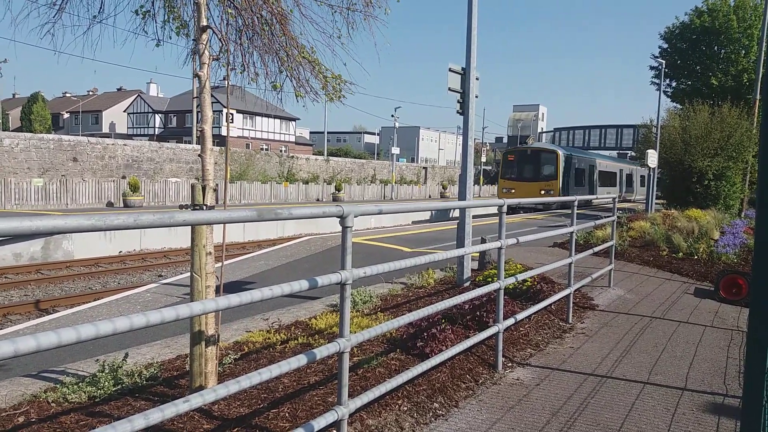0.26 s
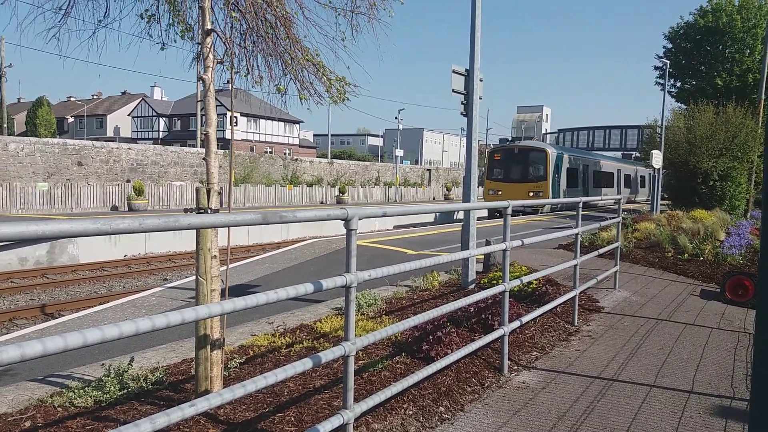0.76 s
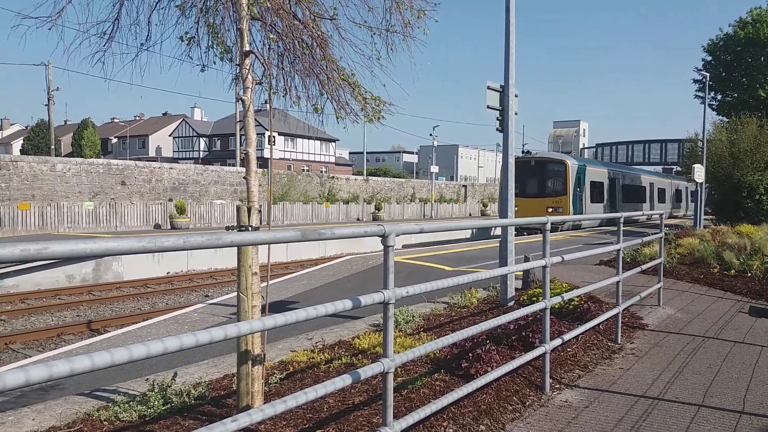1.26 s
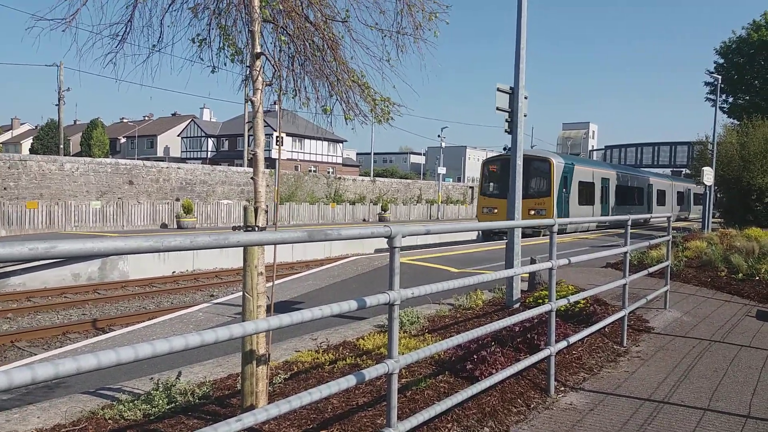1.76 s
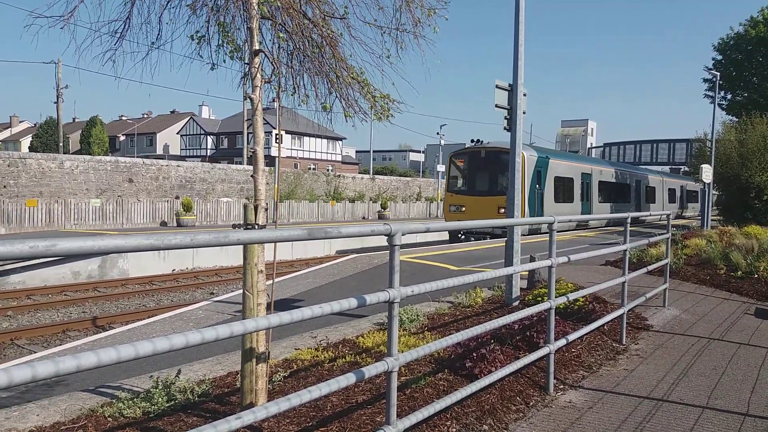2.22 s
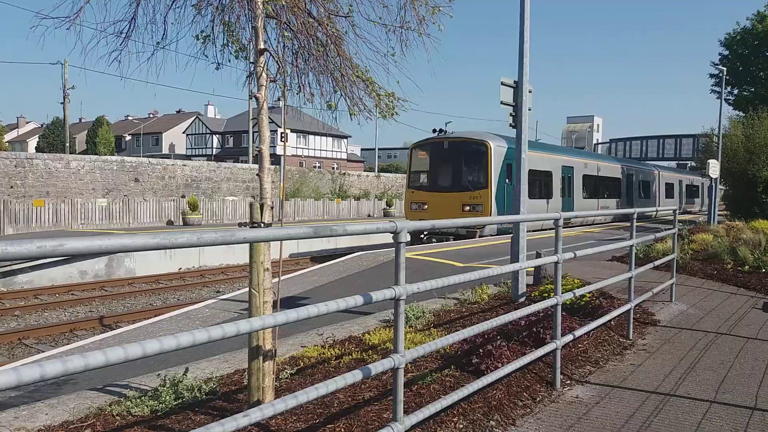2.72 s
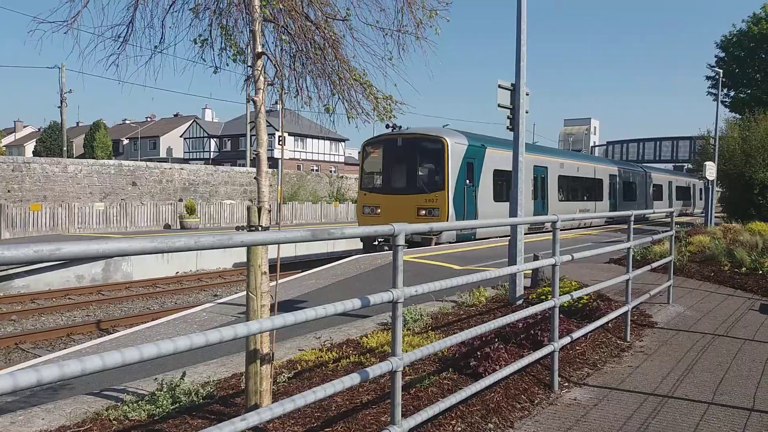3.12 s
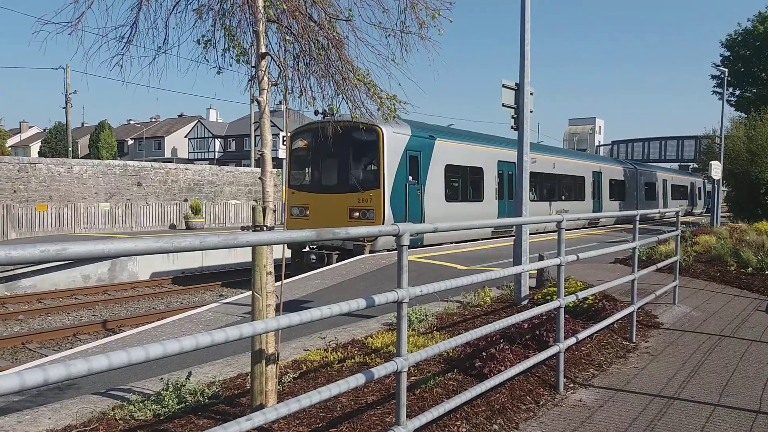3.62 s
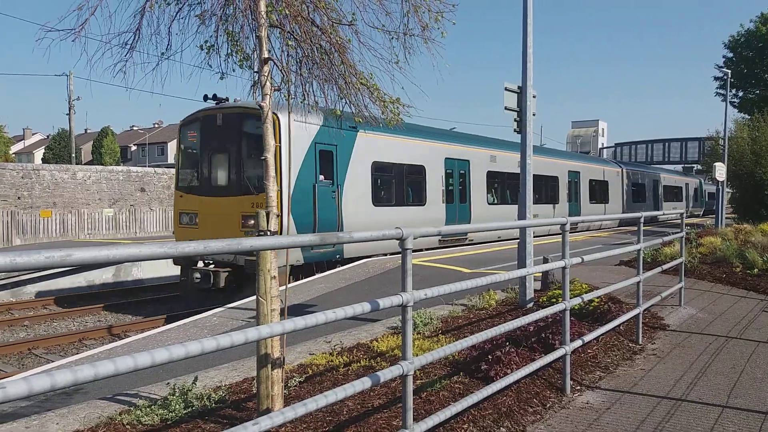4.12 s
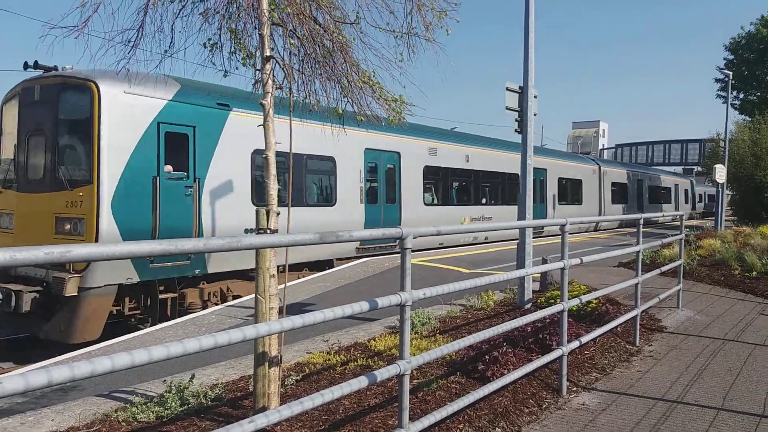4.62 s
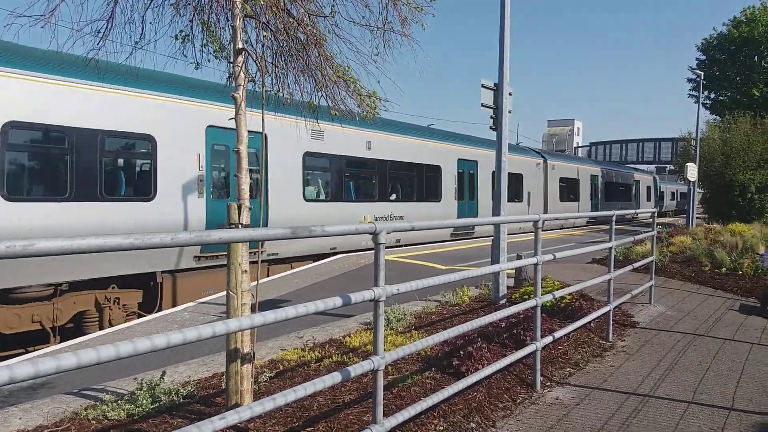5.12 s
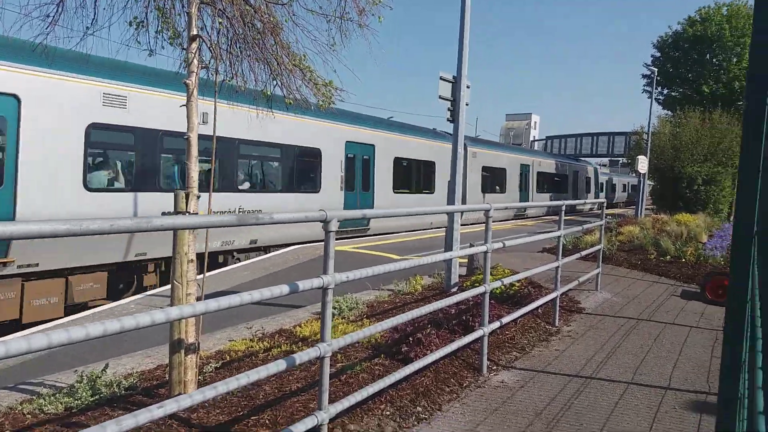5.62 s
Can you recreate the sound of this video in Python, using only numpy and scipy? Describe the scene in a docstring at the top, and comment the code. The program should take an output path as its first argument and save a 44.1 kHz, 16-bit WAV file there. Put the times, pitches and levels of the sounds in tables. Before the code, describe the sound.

A diesel passenger train approaches and passes close by a platform outdoors, heard by one mono microphone with little deep bass and no obvious echo. From 0 to 1.5 s a low throbbing drone around 80 Hz beats as a slower engine revs up and merges with the others. The drone surges strongly near 2 s, then keeps swelling and dipping while creeping slightly upward in pitch, over rumbling exhaust. Soft wheel-rail roar and fan hiss grow throughout, with a faint very high turbocharger band strongest near 4 s. Two light dull knocks come at 2.8 s, stronger ones between 3.9 and 4.2 s, another at 5.5 s. A valve vents a short airy hiss around 4.6-4.8 s. From about 4.7 s a wavering gear whine near 1700 Hz emerges; a tiny upward squeak flicks at 5.35 s. The rushing roar is loudest at the end, about 5.9 s, without fading.

```python
"""A throbbing diesel drone comes first: a railcar pulls towards a platform, its underfloor engines revving up.
The drone is cosines on multiples of the crank speed; a late engine beats against the others before it merges.
Shaped noise makes the exhaust rumble, wheel and rail roar, fan hiss and turbocharger band as the train nears.
Short pushes knock over rail joints, a valve hisses once, and a wavering gear tone emerges near the end."""
import sys
import numpy as np
from scipy import signal
from scipy.io import wavfile
from scipy.ndimage import uniform_filter1d

SR = 44100
rng = np.random.default_rng(int(sys.argv[2]) if len(sys.argv) > 2 else 0)


def boost(x):
    """Linear amplitude factor 10**(x/20) for a level x in decibels (scalar or array-like)."""
    u = np.asarray(x, float) / 20
    return 10 ** u


def output_pcm(signal):
    """Save a mono or channel-first signal as 16-bit PCM at the path in sys.argv[1].

    Samples are clipped to [-1, 1] before scaling.
    """
    pcm = np.clip(np.atleast_2d(signal).T, -1, 1) * 32767
    wavfile.write(sys.argv[1], SR, np.round(pcm).astype(np.int16))


N = 258867
T = np.arange(N) / SR  # time of every sample in s

# How the approach grows: t/s, rolling roar level/dB, fan hiss level/dB, thin top hiss level/dB
APPROACH = [(0, -37.5, -37, -58.5), (.5, -37.5, -39, -61.5), (1, -36.5, -38, -58), (1.5, -36, -38, -58),
            (2.11, -33.5, -39, -59.5), (2.66, -32, -34.5, -54), (3.12, -31.5, -36, -55.5),
            (3.56, -30, -32, -52), (3.9, -28, -32.5, -54), (4.2, -27.5, -33.5, -53),
            (4.55, -28.5, -32, -51.5), (5, -26.5, -36, -52), (5.3, -24.5, -34, -50),
            (5.55, -21, -30.5, -47), (5.87, -18, -28, -43.5)]

# Noise colours, used for their shape only: f/Hz, level/dB (per Hz)
RUMBLE_FAR = [(24, -39), (40, -34), (70, -3), (119, -8), (157, -1), (265, -7.5), (314, -11), (371, -16.5),
              (700, -21.5), (910, -54), (1540, -120)]
RUMBLE_NEAR = [(24, -43), (40, -33), (58, -16), (86, 3), (107, -2.5), (129, -5.5), (177, -3.5), (299, -5.5),
               (700, -17.5), (910, -49), (1540, -120)]
ROLL_FAR = [(260, -26), (450, -13), (471, -6.5), (570, -3.5), (660, -12), (781, -2.5), (1300, -7.5),
            (1480, -2.5), (1800, -7.5), (2800, -8.5), (3640, -41), (6160, -120)]
ROLL_MID = [(260, -9), (450, 0.5), (665, -8), (781, 0.5), (843, -0.5), (1340, -7), (1550, 0.5),
            (1730, -0.5), (2400, -9.5), (2800, -9), (3640, -19), (6160, -120)]
ROLL_NEAR = [(260, -29), (450, -8), (482, -1.5), (675, -5.5), (799, -2), (1190, -1), (1360, -3),
             (1690, -0.5), (2370, -11), (2800, -14.5), (3640, -34), (6160, -120)]
FAN_FAR = [(1470, -13), (2500, -6), (2630, -44), (2880, -4.5), (3130, -5), (4060, -1.5), (4960, -11),
           (6630, -15), (7800, -38.5), (10100, -67), (17200, -120)]
FAN_MID = [(1470, -19), (2500, -6), (2670, -4), (3250, -4), (3930, 1.5), (5230, -7.5), (6150, -7.5),
           (6860, -13), (7800, -33.5), (10100, -59), (17200, -120)]
FAN_NEAR = [(1470, -13), (2500, -11), (3140, 0), (3760, 2), (4470, 1.5), (5200, -4), (6060, -2),
            (6760, -7.5), (7800, -26), (10100, -55), (17200, -120)]
TOP_FAR = [(5000, -30), (7300, -5.5), (8200, -7), (9000, -1), (10500, -1), (12000, -4), (14000, -4.5),
           (15600, -16)]
TOP_NEAR = [(5000, -30), (7300, -6), (8200, -6), (9300, 0.5), (10500, -1.5), (12000, -3.5), (14000, 0.5),
            (15600, -9)]
JET = [(1470, -35), (2500, -11), (3120, -3.5), (3960, 1), (5590, -8), (6320, -2), (7830, -16.5),
       (12700, -12.5), (15600, -26)]

# Wheel and rail resonances excited by rolling: f/Hz, width/Hz, level/dB (relative to the roar noise)
WHEEL_MODES = [(627, 12, -19), (815, 50, -17), (1179, 25, -18), (1282, 14, -21), (1465, 10, -20),
               (1542, 12, -19), (1633, 12, -20), (1705, 20, -18)]
# Faint bands of noise that swell and fade for a while:
# start t/s, end t/s, f/Hz, width/Hz, level/dB (at the height)
NOISE_BANDS = [(-.4, .42, 4050, 170, -44), (.9, 1.7, 3720, 200, -47), (1.27, 1.8, 4740, 110, -47),
               (2, 2.9, 4300, 150, -45), (1.6, 2.7, 1490, 25, -44), (1.6, 2.6, 780, 60, -44),
               (2.5, 4.2, 1120, 35, -42.5), (2.5, 4.1, 2600, 120, -45.5), (3, 4.6, 1650, 200, -38),
               (3.05, 3.95, 1705, 12, -41), (3.9, 4.6, 2000, 150, -38), (2.4, 4.4, 8950, 40, -67),
               (4.6, 5.0, 435, 12, -38.5), (5.3, 6.2, 9400, 250, -58), (5.7, 6.0, 1465, 14, -26.5),
               (5.55, 6, 210, 12, -29), (5.3, 6, 1950, 40, -38)]
# Wheel blows on rail joints: t/s, peak level/dB, f/Hz, sign of the push
KNOCKS = [(2.813, -19.5, 400, 1), (2.885, -19.5, 450, 1), (3.9268, -9.5, 310, -1), (3.972, -17, 200, 1),
          (4.001, -17, 200, 1), (4.134, -14, 250, 1), (4.168, -10.5, 260, 1), (5.47, -15, 300, 1)]
# Turbocharger blades: t/s, centre f/Hz, level/dB, width/Hz
TURBO = [(0, 12600, -67, 300), (.8, 13000, -66, 350), (1.5, 13250, -63, 400), (2.2, 13200, -62, 450),
         (3, 13350, -56, 600), (4, 13300, -53, 650), (4.6, 13500, -58, 600), (5.2, 14000, -55, 600),
         (5.87, 14050, -56, 700)]
# Gear whine: t/s, level/dB (of the clean tone)
WHINE = [(4.66, -44), (4.79, -33), (4.86, -37), (5.04, -30), (5.13, -25), (5.2, -33), (5.36, -29.5),
         (5.43, -32), (5.6, -26.5), (5.67, -30), (5.745, -23.5), (5.79, -30), (5.83, -23.5), (5.87, -24)]

# Leading engines: t/s, crank speed/(turns per s)
SPEED = [(0, 27.5), (.5, 27.9), (2, 28.15), (5, 29.0), (5.87, 29.1)]
# Crank orders (tones at multiples of crank speed): t/s, then level/dB of orders 3 (the firing rate), 5 and 6,
# and level/dB of the pair 8 and 12 (order 8 is then lowered and wavers)
ENGINE = [(0, -42, -34, -42, -47.5), (.2, -27.5, -43, -37.5, -45), (.45, -41.5, -35, -36, -48.5),
          (.62, -33.5, -31, -29, -50), (.9, -28, -41, -33, -50), (1.2, -29, -38, -31.5, -39),
          (1.45, -22, -42, -37.5, -57), (1.63, -21, -44, -24, -44), (1.95, -16.5, -48, -26, -51),
          (2.25, -18, -36, -32, -38.5), (2.5, -20, -29.5, -48, -42), (2.62, -22.5, -34, -32.5, -43),
          (2.8, -23.5, -24.5, -24, -53), (3.17, -24.5, -34, -27.5, -54), (3.45, -19.5, -35, -41.5, -50),
          (3.85, -18, -34, -38, -59), (4.2, -20, -34, -45, -43), (4.45, -25, -44, -31, -47),
          (4.6, -29, -35, -38, -39), (4.83, -20, -37, -34, -40.5), (5.1, -23, -45, -26, -29),
          (5.33, -19.5, -29, -27.5, -45), (5.65, -24.5, -37, -30, -44), (5.87, -28, -38, -43, -40)]
# The crank orders that take the three separate levels: order
STRONG_ORDERS = (3, 5, 6)
# The two crank orders that swell together: order
PAIRED_ORDERS = (8, 12)
# Weaker orders from uneven cylinders: order, level/dB (before it wavers and follows the approach)
WEAK_ORDERS = [(4, -47), (4.5, -47.5), (5.5, -44.5), (7, -44.5), (9, -46), (10.5, -46.5), (11, -47.5),
               (15, -54)]
# An engine that revs up late and catches the others: t/s, crank speed/(turns per s)
LAG_SPEED = [(0, 24.6), (.25, 25.3), (.5, 26.1), (.75, 26.7), (1, 27.2), (1.25, 27.6), (1.5, 28.1)]
# Firing order of the late engine: t/s, level/dB
LAGGING = [(0, -27), (.12, -36), (.24, -26), (.45, -47), (.7, -36), (.85, -30), (1.1, -55), (1.45, -70)]
# Its upper orders until it merges: order, level/dB (before it wavers)
LAG_UPPER = [(5, -40), (6, -45)]


def evened(x):
    """Scale a signal to rms 1."""
    return x / np.sqrt(np.mean(x ** 2) + 1e-20)


def read(points, hz):
    """Read a noise colour at any frequency, on a logarithmic frequency scale."""
    f, value = np.transpose(points)
    return np.interp(np.log(hz + 1), np.log(f + 1), value)


def follow(rows):
    """Give all columns of a timed table at every sample."""
    s, *columns = np.transpose(rows)
    return [np.interp(T, s, c) for c in columns]


def nearness_db():
    """Tell how far the rolling roar is above its mean level; this marks how near the train is."""
    roll_db = follow(APPROACH)[0]
    return roll_db - roll_db.mean()


def wander(top_hz):
    """Make a slow random curve of rms 1 from sines up to top_hz, the slower ones stronger."""
    t = T[::256]
    sines = [np.sin(2 * np.pi * (f * t + rng.random())) / np.sqrt(f)
             for f in top_hz * np.geomspace(.05, 1, num=12)]
    return np.interp(T, t, evened(sum(sines)))


def narrow(hz, width):
    """Shift low-passed noise up to a centre that may move; its width may drift between two values."""
    real, imaginary = rng.standard_normal((2, N))
    turn = np.exp(2j * np.pi * np.cumsum(hz * np.ones(N)) / SR)
    ends = []
    for r in np.exp(-np.pi * np.unique([np.min(width), np.max(width)]) / SR):
        smooth = signal.lfilter([1], np.convolve([1, -r], [1, -r]), real + 1j * imaginary)
        ends.append(evened((smooth * turn).real))
    wide = (width - np.min(width)) / (np.ptp(width) + 1e-9)
    return (1 - wide) * ends[0] + wide * ends[-1]


def noise(spectra, at, patchy_db, flicker_db, size=1024):
    """Build noise from random short spectra whose colour passes through the spectra at the given times."""
    frames, hz = 4 * N // size + 5, np.fft.rfftfreq(size, 1 / SR)
    a, b, patches = rng.standard_normal((frames, len(hz), 3)).T
    # patches vary over frequency and time; flicker moves a whole frame at once
    patches = uniform_filter1d(patches, size=10, axis=0)
    patches = evened(uniform_filter1d(patches, size=12, axis=1))
    flicker = evened(uniform_filter1d(rng.standard_normal(frames), size=3))
    # blend the two colours nearest in time
    place = np.interp(np.arange(frames) * size / 4 / SR, at, np.arange(len(at)))
    shares = np.maximum(1 - abs(place - np.arange(len(at))[:, None]), 0)
    colour = boost(np.transpose([read(s, hz) for s in spectra]) @ shares)
    colour /= np.linalg.norm(colour, axis=0)  # equal power before the patches and flicker
    z = (a + 1j * b) * colour * boost(patchy_db * patches + flicker_db * flicker)
    return evened(signal.istft(z, nperseg=size, noverlap=3 * size // 4)[1][:N])


def orders(speed, multiples, levels_db, start=0):
    """Add cosines on multiples of a crank speed, in step so that they pile up into exhaust pulses."""
    turns = start + np.cumsum(speed) / SR
    return sum(boost(db) * np.sqrt(2) * np.cos(2 * np.pi * k * turns) for k, db in zip(multiples, levels_db))


def top_hiss():
    """A thin hiss at the top of the treble grows with the approach."""
    level_db = follow(APPROACH)[2]
    return boost(level_db) * noise([TOP_FAR, TOP_NEAR], [2.5, 5.6], patchy_db=0.3, flicker_db=0.5, size=512)


def fans():
    """Cooling fans stir the air into a hiss that throbs slightly with the engine firings."""
    level_db = follow(APPROACH)[1]
    firing = np.cos(2 * np.pi * 3 * np.cumsum(follow(SPEED)[0]) / SR)  # three firings a turn
    hiss = noise([FAN_FAR, FAN_MID, FAN_NEAR], [.6, 3.5, 5.6], patchy_db=0.8, flicker_db=.5, size=512)
    return boost(level_db) * hiss * (1 + 0.056 * firing)


def rolling():
    """Rough wheels and rails make a roar and excite their own resonances."""
    level_db = follow(APPROACH)[0]
    roar = noise([ROLL_FAR, ROLL_MID, ROLL_NEAR], [1.5, 3.8, 5.6], patchy_db=0.76, flicker_db=0.24)
    modes = sum(boost(db) * narrow(hz, width) for hz, width, db in WHEEL_MODES)
    return boost(level_db) * (roar + modes)


def noise_bands():
    """Faint bands of noise swell and fade for a while, so the colour of the noise drifts."""
    out = np.zeros(N)
    for a, b, hz, width, db in NOISE_BANDS:
        swell = np.sin(np.pi * np.clip((T - a) / (b - a), 0, 1)) ** 0.54
        out += boost(db) * ((T > a) & (T < b)) * swell * narrow(hz, width)
    return out


def squeak():
    """One faint, short tone slides upwards."""
    moment_s, middle_hz, level_db = 5.345, 10150, -49
    t = T - moment_s
    # pitch rises by 6000 Hz per s, twice the factor in the phase
    return boost(level_db) * np.exp(-(t / .014) ** 2) * np.sin(2 * np.pi * (middle_hz + 3000 * t) * t)


def knocks():
    """Each wheel blow on a rail joint is one dull push that swings back once."""
    out = np.zeros(N)
    for s, db, hz, sign in KNOCKS:
        cycles = hz * (T - s)
        envelope = np.exp(-(cycles / np.where(cycles < 0, .3, .8)) ** 2)  # quick rise, slower decay
        out += sign * boost(db) * np.cos(2 * np.pi * cycles) * envelope
    return out


def blow_off():
    """A valve vents compressed air: a wide jet hiss that swells, sags and shuts."""
    full_s, rise_s = 4.62, .035
    shut_s, release_s = 4.77, .055
    level_db, sag_db_per_s = -28, -22
    rise = np.exp(np.minimum(T - full_s, 0) / rise_s)
    shut = np.exp(-(np.maximum(T - shut_s, 0) / release_s) ** 2)
    level = boost(level_db + sag_db_per_s * np.maximum(T - full_s, 0))
    return rise * shut * level * noise([JET], [0], patchy_db=1.5, flicker_db=-1.3, size=256)


def gears():
    """Meshing gear teeth give a tone that wavers, with a little fuzz."""
    mesh_hz, waver_hz = 1704, 4
    hz = mesh_hz + waver_hz * wander(top_hz=6)
    clean = np.sqrt(2) * np.sin(2 * np.pi * np.cumsum(hz) / SR)
    fade_in = np.clip((T - WHINE[0][0]) * 10, 0, 1)
    return fade_in * boost(follow(WHINE)[0]) * (clean + 0.2 * narrow(hz, width=44))


def turbocharger():
    """Turbocharger blades make a fuzzy high band whose centre climbs overall."""
    hz, db, width = follow(TURBO)
    return boost(db) * narrow(hz, width)


def exhaust_rumble():
    """Low noise from the exhaust grows by about half as many dB as the rolling roar."""
    rumble = noise([RUMBLE_FAR, RUMBLE_NEAR], [1.5, 5.4], patchy_db=1.0, flicker_db=1.6, size=4096)
    return boost(-30 + 0.56 * nearness_db()) * rumble


def leading_engines():
    """Regular firings give strong crank orders; uneven cylinders add weaker ones that waver."""
    speed = follow(SPEED)[0]
    *strong_db, paired_db = follow(ENGINE)
    strong = orders(speed, STRONG_ORDERS, strong_db)
    paired = orders(speed, PAIRED_ORDERS, [paired_db - 3 + 3 * wander(top_hz=5.9), paired_db])
    growth_db = 0.56 * nearness_db()
    weak_db = [db + np.minimum(5 * wander(top_hz=4), 4) + growth_db for _, db in WEAK_ORDERS]
    weak = orders(speed, [k for k, _ in WEAK_ORDERS], weak_db, start=rng.random())
    return strong + paired + weak


def late_engine():
    """A slower engine catches up; its firings beat with the others until it merges."""
    merge_s, merge_db_per_s = 1.22, -82
    start_turns = -.097  # crank offset that sets when the firings cancel
    merge_db = merge_db_per_s * np.maximum(T - merge_s, 0)
    upper_db = [db + merge_db + 3 * wander(top_hz=4.5) for _, db in LAG_UPPER]
    return orders(follow(LAG_SPEED)[0], STRONG_ORDERS, follow(LAGGING) + upper_db, start=start_turns)


def scene():
    """Everything reaches one microphone."""
    surroundings = top_hiss() + fans() + rolling() + noise_bands()
    events = squeak() + knocks() + blow_off() + gears()
    engines = turbocharger() + exhaust_rumble() + leading_engines() + late_engine()
    return (surroundings + events + engines)[None]


def roll_off(x):
    """The treble ends steeply here."""
    return signal.sosfilt(signal.butter(12, 15760, fs=SR, output="sos"), x)


def record(dry):
    """The microphone cuts the deepest bass, below about 45 Hz."""
    low_cut = signal.butter(2, 45, "high", fs=SR, output="sos")
    mix = signal.sosfilt(low_cut, dry)
    return roll_off(mix)


dry = scene()
out = record(dry)
output_pcm(out)
```